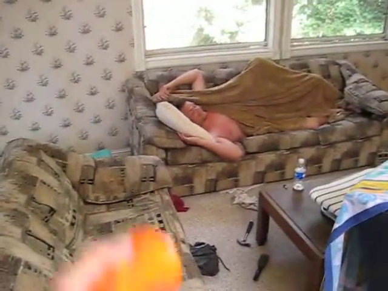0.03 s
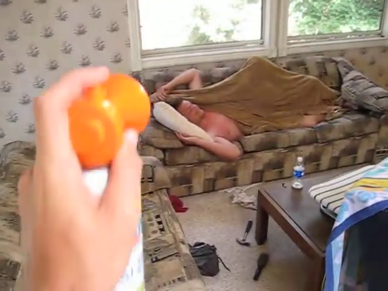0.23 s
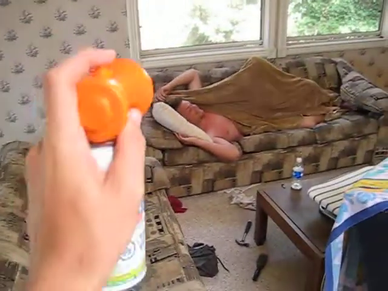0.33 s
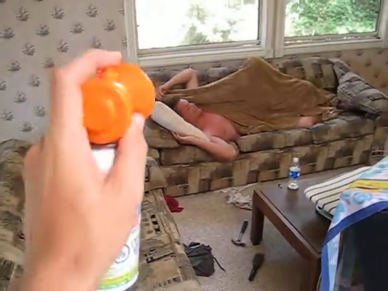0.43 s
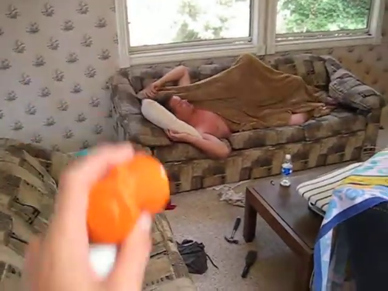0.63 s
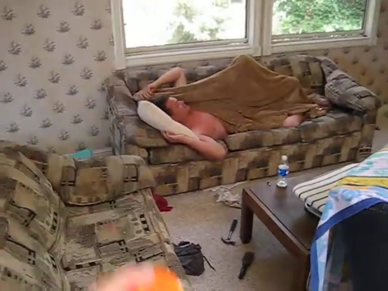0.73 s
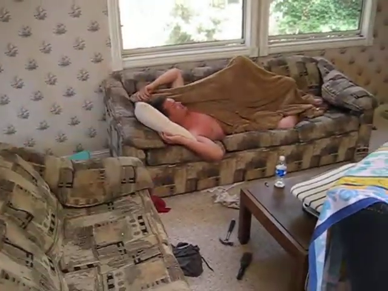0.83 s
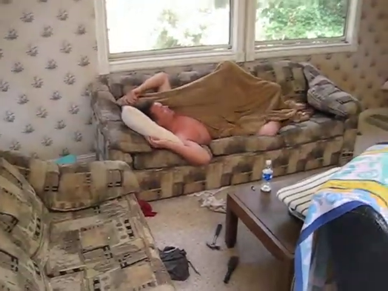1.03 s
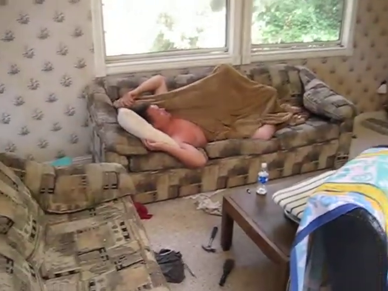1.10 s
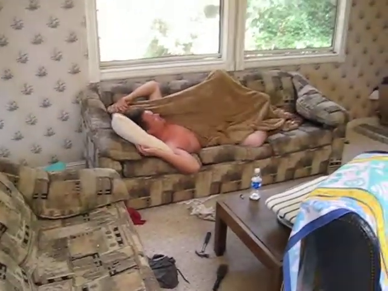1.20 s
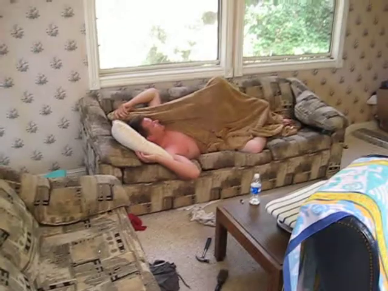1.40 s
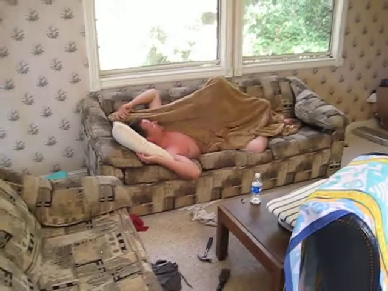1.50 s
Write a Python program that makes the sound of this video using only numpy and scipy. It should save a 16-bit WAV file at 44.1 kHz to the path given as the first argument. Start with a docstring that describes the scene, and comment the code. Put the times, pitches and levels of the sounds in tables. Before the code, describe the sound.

One abrupt, piercing gas-can horn honk close by, ringing off the room before faint sofa rustling

```python
"""Small knocks of hand and cloth come first, then one short blast of a gas-can air horn in a living room.
Noise makes the valve's hiss, a falling sine the squeal, and a stack of overtones the horn's sagging note.
A small mono camera close by clamps its gain on the blast and recovers while the room rings on.
Then patchy dull noise makes cloth and cushions rustle on a sofa across the room, with more knocks.
Room tone, microphone hiss and a faint steady whine lie underneath."""
import sys
import numpy as np
from scipy import signal
from scipy.fft import rfft, irfft, next_fast_len
from scipy.io import wavfile
from scipy.ndimage import uniform_filter1d, minimum_filter1d, map_coordinates

SR = 44100
rng = np.random.default_rng(int(sys.argv[2]) if len(sys.argv) > 2 else 0)


def invert_db(level):
    """Linear amplitude ratio for a level in decibels (20 dB per decade), elementwise."""
    return 10 ** (np.asarray(level, dtype=float) / 20)


def store_pcm(level_fs):
    """Save levels as 16-bit WAV."""
    pcm = np.round(np.clip(level_fs, -1, 1) * 32767).astype(np.int16)
    wavfile.write(sys.argv[1], SR, np.atleast_2d(pcm).T)


N = 68355
T = np.arange(N) / SR


def unit(x):
    """Scales a sound to rms 1."""
    return x / np.sqrt(np.mean(x ** 2) + 1e-20)


def along(points, hz):
    """Reads a curve of (frequency, value) points on a log frequency axis."""
    f, value = np.transpose(points)
    return np.interp(np.log(hz + 1), np.log(f + 1), value)


def level(s, db):
    """Gain over time through points in dB, practically silent outside them."""
    return invert_db(np.interp(T, s, db, -150, -150))


def wobble(rate):
    """A smooth random curve with the given number of random points a second."""
    points = rng.standard_normal(int(N * rate / SR) + 4)
    return map_coordinates(points, [T * rate])


def filtered(x, response):
    """Multiplies the spectrum of x by a response of frequency."""
    m = next_fast_len(N + 8192)  # spare room so the end does not wrap onto the start
    hz = np.fft.rfftfreq(m, 1 / SR)
    return irfft(rfft(x, m) * response(hz), m)[:N]


def noise(spectrum, patchy_db=0):
    """Coloured noise of rms 1, with patches of random gain in time and frequency."""
    z = signal.stft(rng.standard_normal(N), nperseg=512)[2]
    patches = uniform_filter1d(rng.standard_normal(z.shape), size=4, axis=0)
    patches = uniform_filter1d(patches, size=8, axis=1)
    x = signal.istft(z * invert_db(patchy_db * unit(patches)), nperseg=512)[1][:N]
    return unit(filtered(x, lambda hz: invert_db(along(spectrum, hz))))


# course of the blast: time_s, pitch_hz, level_db, dullness_db (lost per overtone order, counted from the third)
HORN_BLAST = [(.251, 1164, -8, 6.5), (0.256, 1030, -1.5, 9), (0.2599, 980, 23.5, 7.5),
              (0.269, 870.7, 21, 3.5), (.281, 839, 24.5, 1), (0.29, 793, 33.5, 0),
              (0.313, 767, 32.5, -1.14), (0.33, 755.8, 31, -0.76), (0.397, 745.1, 36, 1.85),
              (0.411, 746.1, 24, 5.5), (0.439, 748, 0, 12.5), (.47, 752, -13, 13), (.5, 742, -59, 8)]
# strength of each overtone against the others: order, relative_db
HORN_OVERTONES = [(1, -1.5), (2, -2.5), (3, 1.5), (4, -5.5), (5, -6.5), (6, -13), (7, -18.5), (8, -25.5),
                  (9, -27.5), (10, -29.5), (11, -30), (12, -28.5), (13, -32), (14, -35), (15, -41.5),
                  (16, -66), (17, -55), (18, -57.5)]
# colour of the escaping gas, also used by the valve: frequency_hz, relative_db
GAS_COLOUR = [(120, -92), (200, -45.5), (1380, -15), (2250, 7), (2900, 0.5), (5200, -8), (6590, -4.5),
              (8820, -7), (12200, -29), (13400, -10), (15500, -36)]
# colour of the low gas turbulence: frequency_hz, relative_db
PUFF_COLOUR = [(8, -13), (25, 15), (60, -12.5), (130, -4), (500, -13), (1200, -8.5), (3000, -101)]


def horn():
    """The diaphragm chops the gas once a cycle: overtones that brighten as pressure builds, breath and puff."""
    s, hz, db, dull_db = np.transpose(HORN_BLAST)
    pitch_hz = np.interp(T, s, hz) * (1 + 0.001 * wobble(120))  # the pitch trembles slightly
    phase = 2 * np.pi * np.cumsum(pitch_hz) / SR
    loss_db = np.interp(T, s, dull_db)
    tone = np.zeros(N)
    for order, order_db in HORN_OVERTONES:
        tone += invert_db(order_db - 9.5 - loss_db * (order - 3)) * np.sin(order * phase)
    breath = invert_db(-39) * noise(GAS_COLOUR) * (1 + np.cos(phase))  # gas noise pulses with each cycle
    puff = invert_db(-37 - 6.9 * loss_db) * noise(PUFF_COLOUR)  # weaker while the tone is dull
    envelope = level(s, db)
    return envelope * (tone + breath), envelope * puff


# gas escaping before and as the tone locks: time_s, level_db
VALVE_HISS = [(.226, -47), (.233, -42), (.239, -14), (.246, -15.5), (.249, 4.5), (.254, -33.5), (.265, -33)]


def valve():
    """Gas hisses through the horn, and the diaphragm squeals for a few cycles."""
    start_s, life_s, rise_s = 0.2473, 0.0027, 0.00089
    start_hz, sag_hz_per_s = 2390, 120000
    u = np.maximum(T - start_s, 0)
    shape = (1 - np.exp(-u / rise_s)) * np.exp(-(u / life_s) ** 3)
    cycles = start_hz * u - sag_hz_per_s * u * u / 2
    squeal = invert_db(23.5) * shape * np.sin(2 * np.pi * cycles)
    hiss = level(*np.transpose(VALVE_HISS)) * invert_db(2 * wobble(400)) * noise(GAS_COLOUR)
    return hiss + squeal


# how long each frequency takes to die by 60 dB: frequency_hz, decay_s
ROOM_DECAY = [(300, 0.37), (750, 0.64), (1500, 0.74), (2300, 0.71), (4000, 0.76), (8000, 0.71),
              (14000, 0.32)]
# tone colour of everything the room gives back: frequency_hz, gain_db
ROOM_TONE_COLOUR = [(500, 14.5), (750, 0), (1500, 2.5), (2250, 3), (4000, 3.5), (6000, 18.5), (9000, 8.5),
                    (15000, 27.5)]


def room_tail(longer):
    """Noise in which each frequency dies at its own speed, stretched by a factor, with total energy 1."""
    hz, t, z = signal.stft(rng.standard_normal(N), SR, nperseg=256)
    decay_s = longer * along(ROOM_DECAY, hz)[:, None]
    y = signal.istft(z * invert_db(-60 * t / decay_s), SR, nperseg=256)[1][:N]
    return y / np.linalg.norm(y)


def room(x):
    """A quick burst of near reflections, the room's tail, and a fainter, longer one from neighbouring rooms."""
    early = rng.standard_normal(N) * invert_db(-60 * T / 0.27)  # dies by 60 dB in 0.27 s
    early = early / np.linalg.norm(early)
    answer = invert_db(-13.5) * room_tail(1) + invert_db(-31) * room_tail(1.578) + invert_db(-24) * early
    delayed = np.pad(x, (150, 0))  # in samples: the room answers about 3.4 ms late
    wet = signal.fftconvolve(delayed, answer)[:N]
    return filtered(wet, lambda hz: invert_db(along(ROOM_TONE_COLOUR, hz)))


# small knocks of hand and cloth: start_s, level_db, pitch_hz
HAND_KNOCKS = [(.082, -43.5, 825), (.157, -41, 480), (.1755, -34, 1900), (1.245, -54, 3000),
               (1.4205, -31, 605), (1.4365, -28, 1750)]


def knocks():
    """Dull ticks: sines that die within a few cycles, each with a short crackle on top."""
    out = np.zeros(N)
    crackle = noise([(300, -9), (1000, -8), (2000, -1), (2800, -37)])  # frequency_hz, relative_db
    for s, db, hz in HAND_KNOCKS:
        u = np.maximum(T - s, 0)
        out += invert_db(db) * np.sin(2 * np.pi * u * hz) * np.exp(-2 * u * hz / 2.5)
        out += invert_db(db - 10) * (u > 0) * np.exp(-u / 0.004) * crackle
    return out


# rise and fall of the rustling: time_s, level_db
SOFA_RUSTLE = [(.7, -55.5), (.85, -45.5), (1.0, -43.5), (1.12, -41), (1.3, -44), (1.42, -46), (1.55, -52)]
# colour of the moving cloth: frequency_hz, relative_db
CLOTH_COLOUR = [(50, -52), (110, -10), (250, -12.5), (550, -2.5), (1100, -12.5), (2500, -25.5), (6000, -16),
                (8000, -23), (12000, -81)]


def rustle():
    """Blanket and cushions shifting: patchy dull noise of unsteady strength."""
    cloth = noise(CLOTH_COLOUR, patchy_db=3.0)
    return level(*np.transpose(SOFA_RUSTLE)) * invert_db(0.81 * wobble(29.5)) * cloth


# colour of room tone and microphone hiss together: frequency_hz, relative_db
AIR_COLOUR = [(20, -33), (60, -6.5), (250, 1.5), (1300, -10.5), (3000, -15), (6000, -16.5), (8000, -27.5),
              (10700, -11.5), (12500, -28.5), (13400, -23), (14200, -1.5), (15700, -11.5)]
# faint steady tone, played 1 dB below its listed level: pitch_hz, level_db
STEADY_WHINE = [(7558, -62)]


def background():
    """Room tone and microphone hiss as patchy coloured noise, and a faint whine as a sine."""
    out = invert_db(-53) * noise(AIR_COLOUR, patchy_db=2.5)
    for hz, db in STEADY_WHINE:
        out += invert_db(db - 1) * np.sin(2 * np.pi * hz * T)
    return out


def scene():
    """Everything reaches one microphone; the low turbulence is heard only close by."""
    tone, puff = horn()
    near = tone + valve()
    mix = near + room(near) + puff + knocks() + rustle() + background()
    return np.tile(mix, (2, 1))


def gain_control(x):
    """Clamps down on peaks, holds, then climbs back at a steady rate."""
    aim_db, clamp_s, hold_s, recover_db_per_s = 1, 0.002, 0.07, 99.5
    need_db = np.minimum(aim_db - 20 * np.log10(np.abs(x) + 1e-9), 0)
    hold = int(hold_s * SR) // 2 * 2
    # the lowest gain needed within the last hold time
    held_db = minimum_filter1d(need_db, hold + 1, origin=hold // 2, mode="nearest")
    climb_db = recover_db_per_s * T
    gain_db = np.minimum(np.minimum.accumulate(held_db - climb_db) + climb_db, 0)
    lag = np.exp(-1 / (clamp_s * SR))  # the gain follows late, so the onset overshoots
    return x * invert_db(signal.lfilter([1 - lag], [1, -lag], gain_db))


def overload(x):
    """Bends peaks smoothly towards a ceiling, slightly lower on the negative side."""
    ceiling, knee = np.where(x > 0, 0.76, 0.72), 3.54
    return x / (1 + np.abs(x / ceiling) ** knee) ** (1 / knee)


def band_limit(x):
    """A steep low-pass at the top of the band."""
    return signal.sosfilt(signal.butter(12, 16640, fs=SR, output="sos"), x)


# colour of the circuit hiss: frequency_hz, relative_db
CIRCUIT_COLOUR = [(25, 0.5), (200, -3), (2000, 1), (8000, -2), (12000, -4), (15500, -23)]
# the recorder's treble roll-off after the overload: frequency_hz, gain_db
TREBLE_ROLL_OFF = [(3000, -0.07), (6000, -3), (10000, -4.5), (15500, -2)]


def record(dry):
    """The camera turns the gain down, clips the overshoot, adds circuit hiss and limits the band."""
    x = overload(gain_control(dry[0]))
    x = x + invert_db(-51.5) * noise(CIRCUIT_COLOUR)

    def response(hz):
        """Nothing from 15750 Hz up, the treble roll-off, and a gentle cut of the lowest bass."""
        return (hz < 15750) * invert_db(along(TREBLE_ROLL_OFF, hz)) * hz / (hz + 8)

    mix = np.tile(filtered(x, response), (2, 1))
    return band_limit(mix)


dry = scene()
out = record(dry)
store_pcm(out)
```